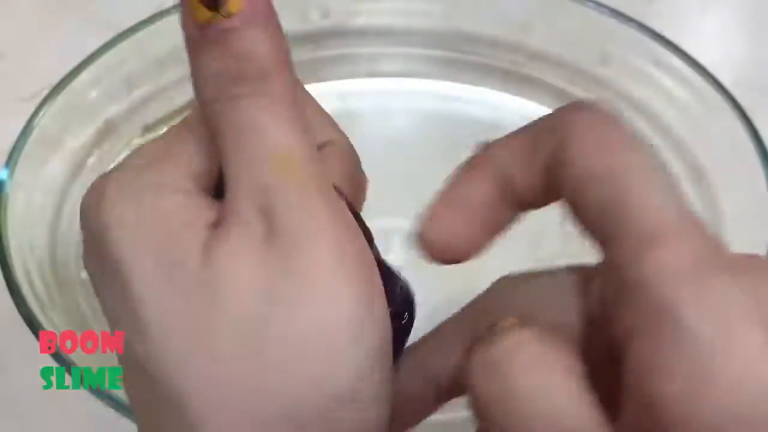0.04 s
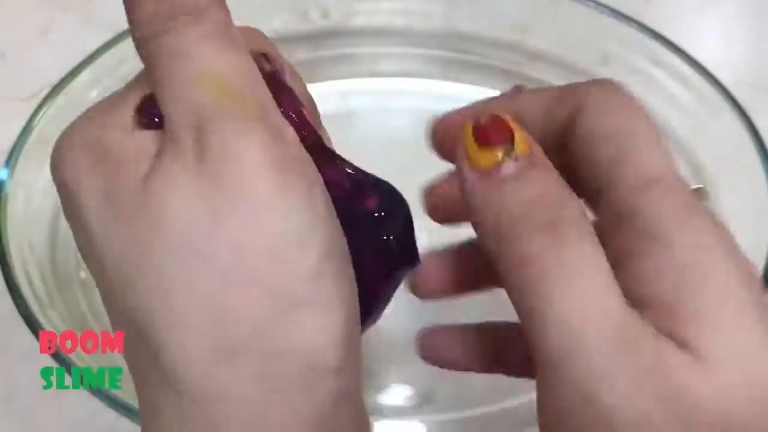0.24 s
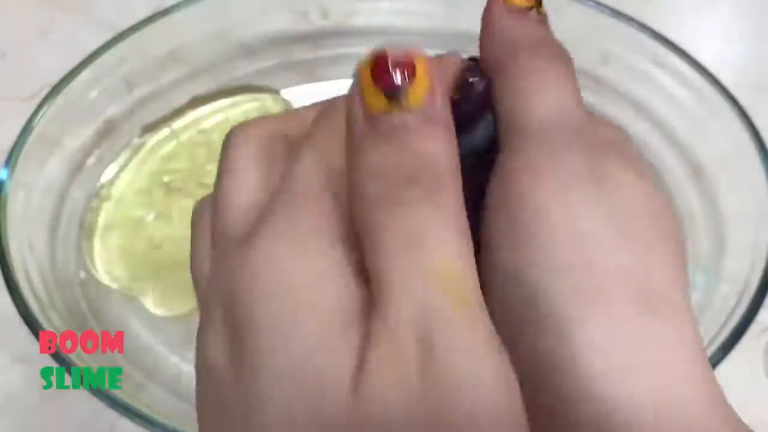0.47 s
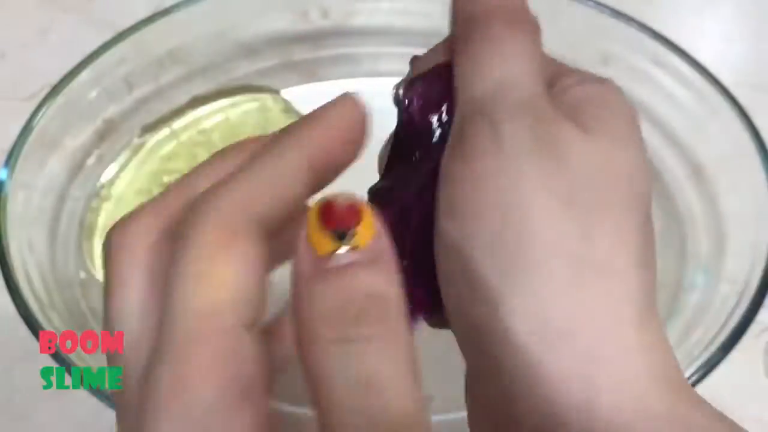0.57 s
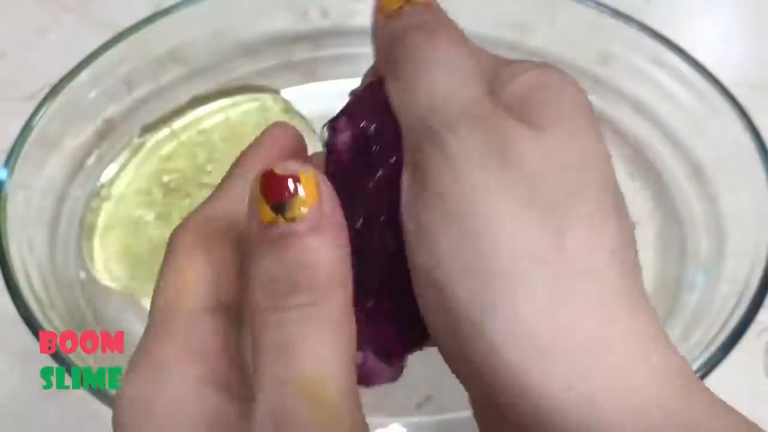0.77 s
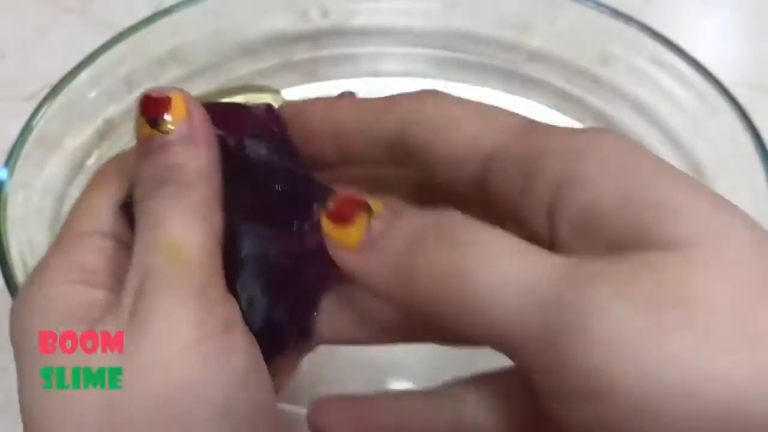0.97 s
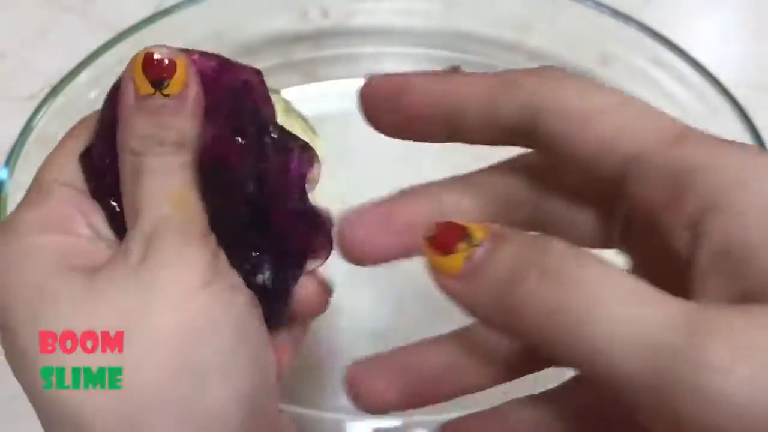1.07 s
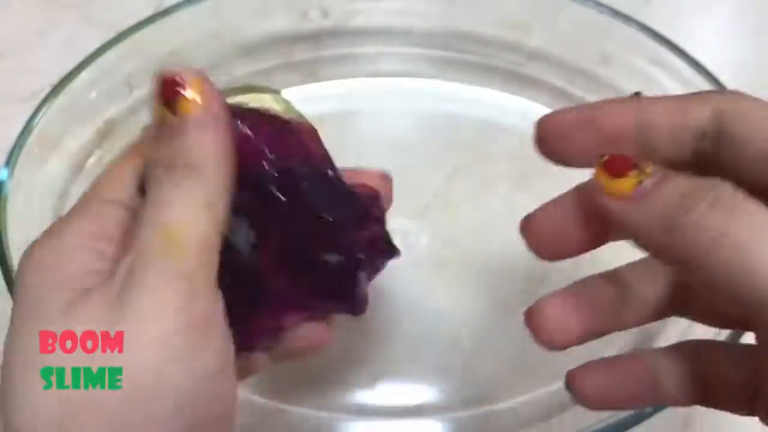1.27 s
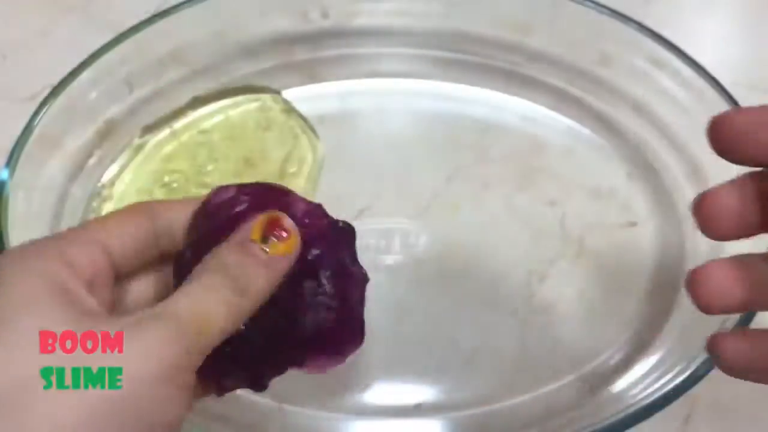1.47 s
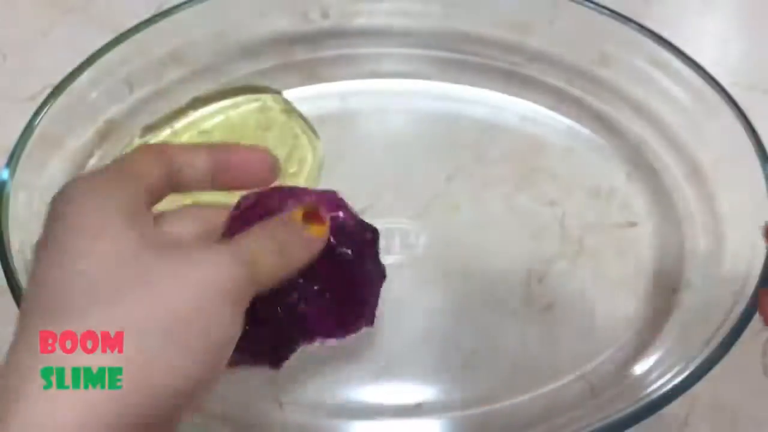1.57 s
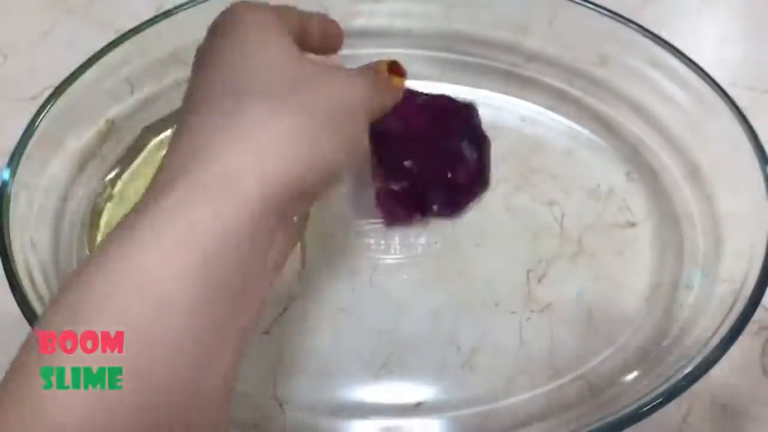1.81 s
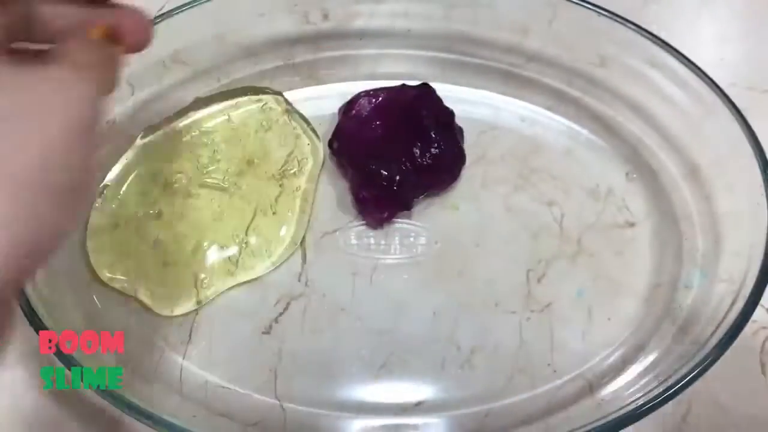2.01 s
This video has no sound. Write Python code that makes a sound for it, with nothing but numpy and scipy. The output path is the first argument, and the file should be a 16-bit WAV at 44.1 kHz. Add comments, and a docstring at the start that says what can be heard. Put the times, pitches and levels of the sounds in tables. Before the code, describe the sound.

Slime air pockets pop in sharp, overloaded cracks, ringing with a hissy echo in a bare room

```python
"""Air pockets burst in soft slime squeezed over a glass dish: short bright cracks, each a train of snaps
exciting resonances, overload the recorder and leave a long hissy echo in a bare, ringing room.
Small ticks are single filtered tears; short crackles and a faint band of high crackling hiss, about a third
of a second long, are dense random clicks; puffs are low damped rings. Beneath lie filtered room noise, a hum
of wavering sines and a faint whirr of moving narrow-band noise. One microphone feeds two equal channels."""
import sys
import numpy as np
from scipy import signal
from scipy.io import wavfile

SR = 44100
rng = np.random.default_rng(int(sys.argv[2]) if len(sys.argv) > 2 else 0)


def pcm_store(signal):
    """Save signal as 16-bit PCM."""
    levels = np.round(np.clip(np.atleast_2d(signal), -1, 1) * 32767)
    wavfile.write(sys.argv[1], SR, levels.astype(np.int16).T)


N = 90404

ECHO_PATHS = 3    # neighbouring pockets reach the walls by different paths
ROOM_BLUR = 1.7   # the room hears each resonance this much wider


def amp(db):
    """Level definition: amplitude ratio from decibels."""
    return 10 ** (np.asarray(db) / 20)


def rms_one(x):
    """Power normalisation: scales a signal to an rms of one."""
    return x / np.sqrt(np.mean(x ** 2) + 1e-20)


def at_hz(points, hz):
    """Spectral interpolation, linear along log frequency."""
    f, value = np.transpose(points)
    return np.interp(np.log(hz), np.log(f), value)


def at_time(points):
    """Linear interpolation of a curve of (t/s, value) over the whole scene."""
    return np.interp(np.arange(N) / SR, *np.transpose(points))


def drift(rate_hz):
    """Low-pass random process: two equal poles smooth noise into slow chance of spread 1."""
    step, settle = 40, 2000   # samples between points, points dropped while the filter settles
    r = np.exp(-2 * np.pi * step * rate_hz / SR)
    noise = rng.standard_normal(N // step + 2 + settle)
    slow = signal.lfilter([1], [1, -2 * r, r * r], noise)[settle:]
    return np.interp(np.arange(N) / step, np.arange(len(slow)), rms_one(slow))


def resonate(x, hz, width_hz):
    """Damped oscillator: a two-pole resonance with gain 1 on top."""
    r = np.exp(-np.pi * width_hz / SR)
    poles = [1, -2 * r * np.cos(2 * np.pi * hz / SR), r * r]
    return signal.lfilter([(1 - r * r) / 2, 0, (r * r - 1) / 2], poles, x)


def add(out, s, sound):
    """Superposition: adds a sound from time s onwards."""
    i = int(s * SR)
    out[i:i + len(sound)] += sound[:N - i]


def click():
    """Unit impulse: equal energy at all frequencies."""
    return np.eye(1, 2048)[0]


def bands():
    """Filter-bank analysis: third-octave bands of white noise with their centres."""
    edges = 30 * 2 ** np.arange(0, 9.4, 1 / 3)
    white = rng.standard_normal((2, N))   # neighbouring bands take different noise
    for k, (low, high) in enumerate(zip(edges, edges[1:])):
        band_pass = signal.butter(2, [low, high], "band", fs=SR, output="sos")
        yield np.sqrt(low * high), signal.sosfilt(band_pass, white[k % 2])


def room_noise():
    """Spectral shaping: noise bands follow a floor curve, drift in level and swell at low frequencies."""
    # Floor spectrum: f/Hz, relative spectral density level/dB
    floor = [(30, -26.5), (45, -12.5), (80, -8), (120, -7), (250, -8), (400, -12), (700, -12.5), (950, -25),
             (1400, -28.5), (1800, -24), (4000, -29.5), (9000, -35.5), (13000, -37.5), (16000, -34)]
    # Course of the low room noise, used relative to its mean: t/s, level/dB
    rumble = [(0.0, -54), (0.26, -56), (0.42, -51), (0.56, -54.5), (0.77, -56.5), (1.07, -53.5),
              (1.43, -57), (2.05, -59.5)]
    level_db, patchy_db, rumble_top_hz = -55, -1, 900
    swell_db = at_time(rumble)
    swell_db -= swell_db.mean()
    noise = np.zeros(N)
    for hz, band in bands():
        band_db = at_hz(floor, hz) + patchy_db * drift(2.3)
        noise += amp(band_db + swell_db * (hz < rumble_top_hz)) * band
    return amp(level_db) * rms_one(noise)


def hum():
    """Random phase and amplitude modulation: sines whose phases waver, broadening each line."""
    # Hum lines: f/Hz, waver rate/Hz, level/dB added to the course below or, for upper lines, its mean
    lines = [(60, 4.7, -0.5), (114, 14, -6.5), (180.6, 21, -8.5)]
    # Level course of the lowest line: t/s, level/dB
    course = [(0.0, -57), (0.03, -49), (0.14, -55), (0.23, -45.5), (0.27, -53.5), (0.55, -49.5),
              (0.76, -66), (0.8, -52), (0.84, -61.5), (1.15, -53), (1.23, -45.5), (1.32, -53.5),
              (1.37, -48), (1.92, -55), (2.02, -49.5), (2.05, -58)]
    t = np.arange(N) / SR
    course_db = at_time(course)
    out = np.zeros(N)
    for k, (hz, rate_hz, db) in enumerate(lines):
        # the upper lines vary by chance about the mean level
        level_db = course_db if k == 0 else course_db.mean() + 2.6 * drift(rate_hz)
        phase = 2 * np.pi * hz * t + 1.3 * drift(rate_hz)
        out += amp(db + level_db) * np.sqrt(2) * np.sin(phase)
    return out


def whirr():
    """Quadrature modulation: two slow noises on a gliding carrier make a moving noise band."""
    # Faint moving band: t/s, centre f/Hz, rms level/dB
    course = [(0, 1232, -56.5), (.2, 1230, -56.5), (.9, 1203, -62), (1.2, 1210, -58.5),
              (1.502, 1280, -62.5), (1.8, 1416, -60), (2.05, 1415, -64)]
    half_width_hz = 150
    s, centre_hz, level_db = np.transpose(course)
    t = np.arange(N) / SR
    phase = 2 * np.pi * np.cumsum(np.interp(t, s, centre_hz)) / SR
    low_pass = signal.butter(2, half_width_hz, fs=SR)
    slow = signal.lfilter(*low_pass, rng.standard_normal((2, N)))
    band = rms_one(slow[0] * np.cos(phase) + slow[1] * np.sin(phase))
    return amp(np.interp(t, s, level_db)) * band


def background():
    """Superposition of room noise, hum and faint whirr."""
    return room_noise() + hum() + whirr()


def room(x):
    """Diffuse reverberation: convolution with noise that builds up and dies exponentially band by band."""
    # Reverberation time, for a decay of 60 dB: f/Hz, T60/s
    decay_time = [(300, .8), (1000, .9), (2200, 1.124), (4500, 1.035), (8000, 0.89), (12000, 0.78),
                  (16000, 0.53)]
    # Starting spectrum of the echo: f/Hz, relative level/dB
    colour = [(300, 0), (700, 8.5), (1300, -7), (2200, 2), (3600, 2.5), (6000, -5), (9000, -5),
              (12000, -1.5), (14000, -5), (16000, 2)]
    level_db, build_s = -10, 0.004
    t = np.arange(N) / SR
    tail = np.zeros(N)
    for hz, band in bands():
        tail += amp(at_hz(colour, hz) - 60 * t / at_hz(decay_time, hz)) * band
    tail *= (1 - np.exp(-t / build_s)) ** 2
    unit_energy_tail = tail / np.sqrt(np.sum(tail ** 2))
    return amp(level_db) * signal.fftconvolve(x, unit_energy_tail)[:N]


def puffs():
    """Impulse response of a cavity: each puff of air is a low resonance struck once."""
    # Low puffs of air: t/s, peak level/dB
    events = [(.2335, -41.5), (.2656, -27.5), (0.7128, -45.5)]
    hz, width_hz = 330, 92   # width of each of two resonances in series
    out = np.zeros(N)
    for s, db in events:
        puff = resonate(resonate(click(), hz, width_hz), hz, width_hz)
        add(out, s, amp(db) * puff / np.max(np.abs(puff)))
    return out


def crackles():
    """Random impulse excitation: dense uneven clicks drive a resonance, heard as crackle or crackling hiss."""
    # Short crackles and one longer faint band of high crackling hiss:
    # start t/s, length/s, level/dB before gating, f/Hz, width/Hz
    events = [(0.087, 0.037, -52, 5230, 1500), (0.109, 0.029, -55.5, 11000, 9000),
              (0.123, 0.022, -44, 7060, 7000), (.80, .33, -60.5, 14600, 3000),
              (1.323, 0.061, -53.5, 4470, 2005), (1.33, 0.047, -54.5, 11520, 9000),
              (1.455, 0.018, -56.5, 11000, 8900), (1.60, .06, -67, 8000, 9000),
              (1.821, 0.05, -60.5, 11000, 8160), (1.919, 0.037, -47.5, 4830, 5960),
              (1.958, 0.05, -57, 2980, 2980)]
    clicks_per_s, spread_db, edge_s = 6000, 4, 0.012
    t, out = np.arange(N) / SR, np.zeros(N)
    for s, length, db, hz, width_hz in events:
        struck = rng.random(N) < clicks_per_s / SR
        strength = amp(spread_db * np.minimum(rng.exponential(1, N), 4))
        clicks = struck * strength * rng.choice([-1, 1], N)
        gate = np.clip(np.minimum(t - s, s + length - t) / edge_s, 0, 1)
        gate *= amp(1.5 * drift(70))
        out += amp(db) * gate * rms_one(resonate(clicks, hz, width_hz))
    return out


def tear(length):
    """Impulsive fracture: the skin gives a first snap, then more snaps over a hiss for a moment."""
    snaps_per_s, snap_db, first_snap_db = 1700, 9.5, 16
    fade_db, release_s = -6, .0004   # fade along the tear, then exponential release
    t = np.arange(2048) / SR
    hiss, chance = rng.standard_normal(len(t)), rng.random(len(t))
    hiss *= np.where(chance < snaps_per_s / SR, amp(snap_db), 1)
    hiss[0] = amp(first_snap_db)
    fade = amp(fade_db * np.minimum(t / length, 1))
    return hiss * fade * np.exp(-np.maximum(t - length, 0) / release_s)


def voiced(x, db, length, hz, width_hz):
    """Source-filter principle: one resonance plus a broad share, energy set by level, length and ringing."""
    broad_db = -13
    narrow = resonate(resonate(x, hz, width_hz), hz, width_hz)
    broad = np.diff(x, prepend=0)   # differencing brightens
    sound = rms_one(narrow) + amp(broad_db) * rms_one(broad)
    duration = length + 1 / (np.pi * width_hz)
    return amp(db) * sound * np.sqrt(duration * SR / len(x)) / 2


def ticks(near, far):
    """Small impulsive sources: each tick is one voiced tear; a clean click sets off the room."""
    # Small ticks: t/s, relative energy level/dB, tear length/s, f/Hz, width/Hz
    events = [(.007, -46, 0.0018, 3830, 540), (0.087, -49, 0.0022, 2540, 500),
              (0.0944, -49, 0.0074, 2670, 500), (.1293, -33.5, 0.0023, 7440, 2500),
              (0.133, -46, 0.0037, 3930, 800), (.1550, -33.5, 0.00087, 7450, 6000),
              (.1550, -31.5, 0.0023, 15200, 2000), (.167, -48, 0.0018, 14500, 3000),
              (.172, -53, .001, 13000, 3000), (0.201, -45, 0.0023, 13000, 2500),
              (0.211, -47.5, 0.012, 9700, 5000), (0.655, -35.5, .005, 2134, 400),
              (1.184, -53, 0.0071, 3500, 498), (1.326, -41, 0.0089, 3660, 804),
              (1.340, -45, 0.0036, 5000, 5000), (1.354, -50, 0.0031, 4140, 893),
              (1.3615, -49, 0.00086, 14100, 4030), (1.367, -46.5, 0.0038, 4580, 900),
              (1.378, -66, 0.0049, 5030, 889), (1.376, -41, .002, 14500, 2460),
              (1.422, -58, .002, 13100, 5030), (1.467, -49.5, 0.007, 5180, 497),
              (1.464, -49, .008, 6000, 1200), (1.461, -52.5, 0.0087, 2785, 602),
              (1.63, -48.5, .001, 11000, 3923), (1.636, -51.5, 0.018, 2380, 412),
              (1.683, -59, 0.0013, 9320, 2510), (1.692, -44.5, .001, 9500, 2510),
              (1.835, -50.5, 0.0045, 6090, 702), (1.8575, -42, 0.0025, 4960, 401),
              (1.864, -39, 0.0013, 5100, 600), (1.878, -56.5, .001, 8060, 8600),
              (1.8952, -36.5, 0.0019, 7520, 9000), (1.8955, -35, 0.0011, 15060, 3000),
              (1.900, -48, 0.0011, 4950, 4020), (1.9133, -33, 0.0041, 12000, 6070),
              (1.914, -38.5, 0.0075, 4000, 2960), (1.9335, -32, 0.0024, 14400, 2010),
              (1.881, -46, 0.0022, 2260, 600), (1.938, -39, .002, 5100, 1510),
              (1.953, -42, 0.0014, 5040, 1000), (1.976, -40, 0.0019, 1600, 300),
              (1.989, -48, 0.0035, 2150, 502), (2.004, -51.5, .003, 4370, 695)]
    send_db = -2.5
    for k, (s, db, length, hz, width_hz) in enumerate(events):
        add(near, s, voiced(tear(length), db, length, hz, width_hz))
        path = far[k % ECHO_PATHS]
        add(path, s, voiced(click(), db + send_db, length, hz, ROOM_BLUR * width_hz))


def pops(near, far):
    """Cavity excitation: a tear cracks and rings each pocket; a clean click sets off the room."""
    # Bursting pockets: t/s, crack level/dB, tear length/s, crack f/Hz, crack width/Hz,
    # cavity level/dB, cavity f/Hz, cavity width/Hz, room send/dB; levels are relative energy levels
    pockets = [(0.22, -14.5, .0008, 8900, 5000, -18.5, 4300, 1200, -1.5),
               (0.22, -30, .008, 4000, 3000, -24, 1146, 200, -5),
               (0.2251, -4.5, .0005, 8450, 4000, -10, 4300, 1500, -9.5),
               (0.2317, 5, .004, 10200, 3500, 0, 14000, 3000, 4),
               (0.235, -3, .002, 8600, 6020, -13.5, 3000, 1995, -0.5),
               (0.2381, -21, 0.0023, 10500, 3000, -13.5, 1700, 900, -5),
               (0.2384, -6, .0005, 4300, 1500, -17, 1150, 300, 1.5),
               (0.241, -9, 0.005, 9570, 4000, -23.5, 1900, 700, -0.5),
               (0.2628, -30.5, .002, 2845, 2000, -11, 1800, 900, -3),
               (.2657, -5, 0.0031, 8520, 8000, -4, 1380, 500, -1.5),
               (0.2658, -4, .003, 4600, 1500, -1.5, 2400, 1400, -3),
               (.2833, -6, .001, 14870, 4000, -12, 5000, 3000, -6),
               (.2860, -12.5, .002, 14500, 5005, -15.5, 8000, 3953, 1.5),
               (0.7104, -53, 0.00054, 7710, 3000, -37, 2860, 900, -0.5),
               (0.7127, 1.5, 0.0031, 7110, 2500, -23.5, 1200, 1000, 0),
               (.7138, -10, 0.0027, 10760, 2520, -6, 5050, 600, -2.5),
               (.7231, -8.5, 0.0041, 7200, 7000, -14.5, 2700, 500, -7),
               (0.7247, -15, .003, 14900, 3000, -23.5, 1450, 400, 1.5),
               (1.931, -27.5, 0.0034, 5000, 3856, -27, 1296, 890, -3),
               (1.931, -30, 0.0011, 7600, 1512, -27.5, 1610, 90, -7.5)]
    for k, pocket in enumerate(pockets):
        s, db, length, hz, width_hz, cavity_db, cavity_hz, cavity_width_hz, send_db = pocket
        direct = (near, tear(length), 1, 1)
        to_room = (far[k % ECHO_PATHS], click(), amp(send_db), ROOM_BLUR)
        for out, x, gain, wide in (direct, to_room):
            add(out, s, gain * voiced(x, db, length, hz, wide * width_hz))
            add(out, s, gain * voiced(x, cavity_db, length, cavity_hz, wide * cavity_width_hz))


def scene():
    """Superposition of direct sound, reverberation and background, equal in both channels."""
    thin_hz, puff_send_db = 810, 1   # small sources radiate little below thin_hz
    near, far = np.zeros(N), np.zeros((ECHO_PATHS, N))
    pops(near, far)
    ticks(near, far)
    crackle, low = crackles(), puffs()
    thin = signal.butter(4, thin_hz, "high", fs=SR, output="sos")
    close = signal.sosfilt(thin, near + crackle)
    far[0] += crackle + amp(puff_send_db) * low
    echo = sum(room(path) for path in far)
    return np.tile(close + low + echo + background(), (2, 1))


def record(dry):
    """Saturation: the microphone dips in the high treble, peaks round off at a ceiling, the top is cut."""
    dip_hz, dip_width_hz, dip_share = 12300, 690, 0.25
    ceiling, cutoff_hz = .87, 16300   # ceiling in full-scale units, before the last filter
    top = signal.cheby2(18, 60, cutoff_hz, fs=SR, output="sos")
    heard = signal.sosfilt(top, dry - dip_share * resonate(dry, dip_hz, dip_width_hz))
    limited = heard / (1 + np.abs(heard / ceiling) ** 6) ** (1 / 6)
    return signal.sosfilt(top, limited)


dry = scene()
out = record(dry)
pcm_store(out)
```